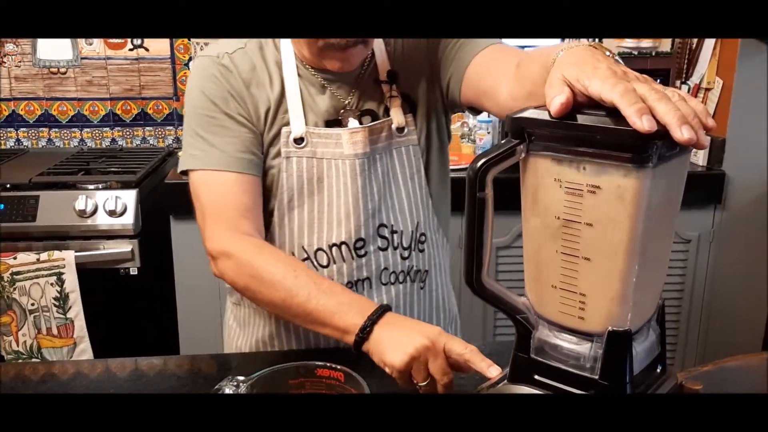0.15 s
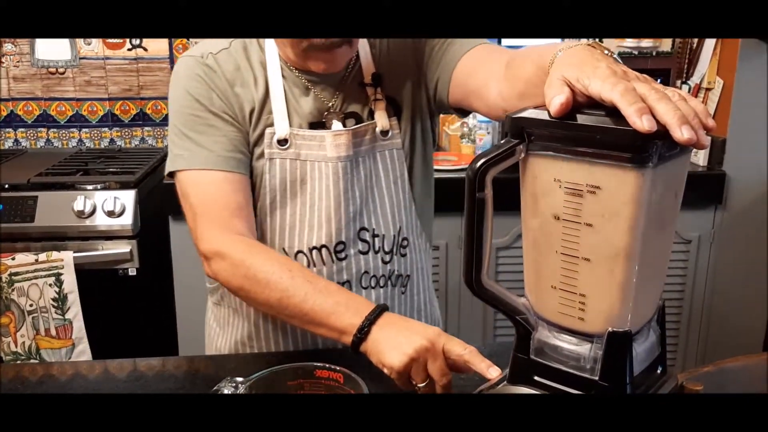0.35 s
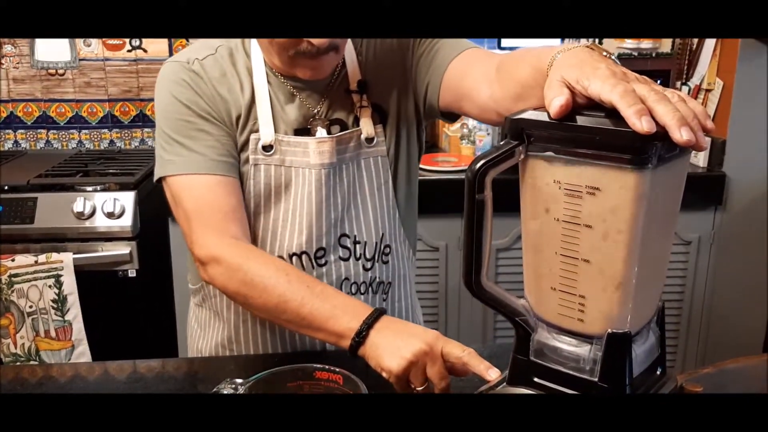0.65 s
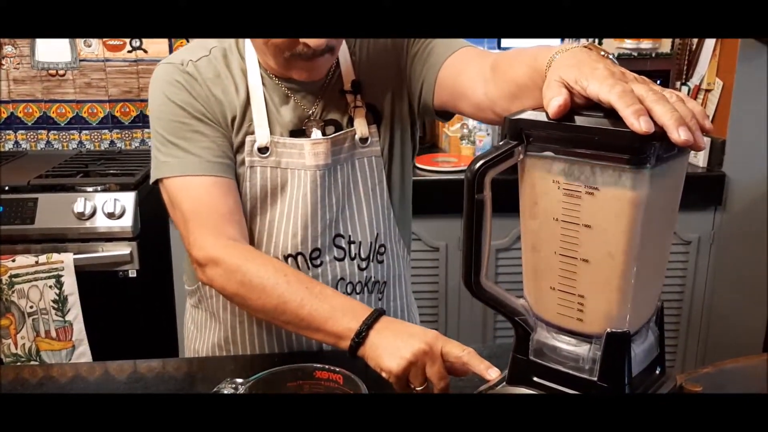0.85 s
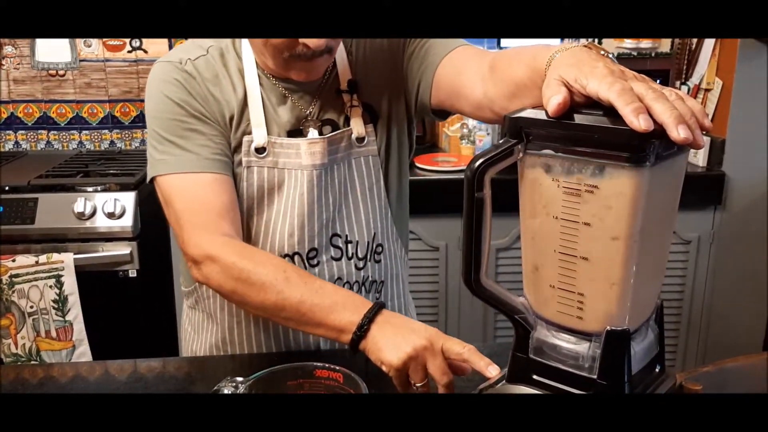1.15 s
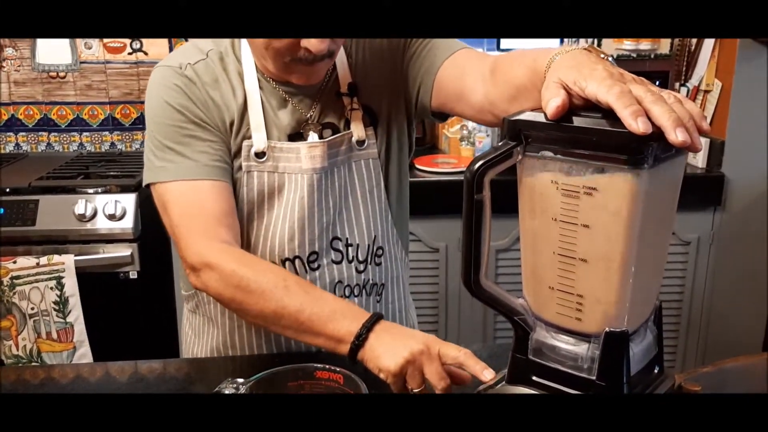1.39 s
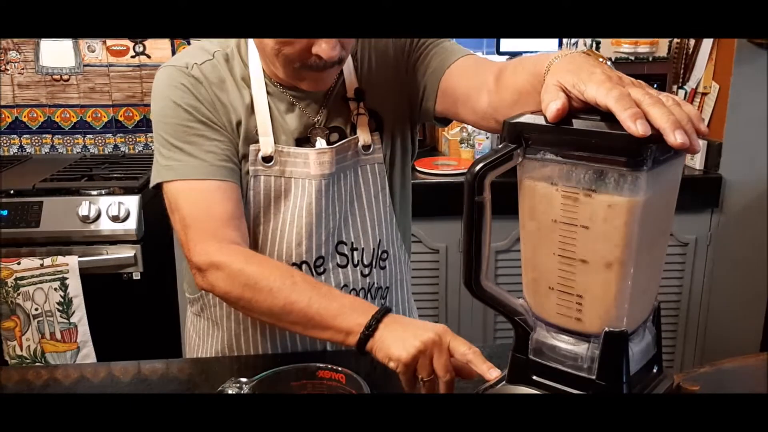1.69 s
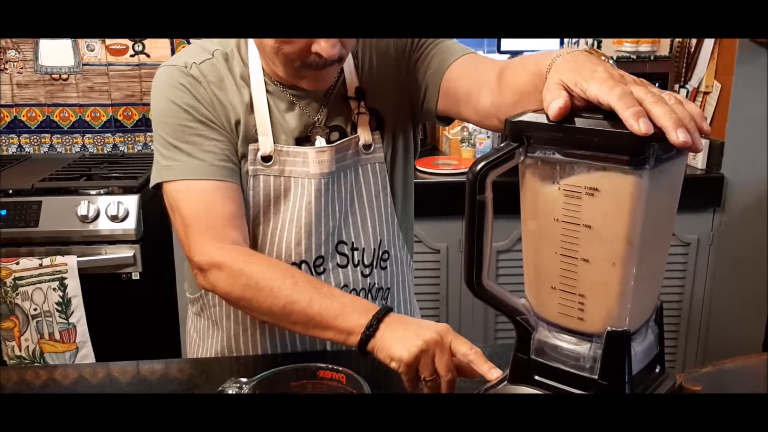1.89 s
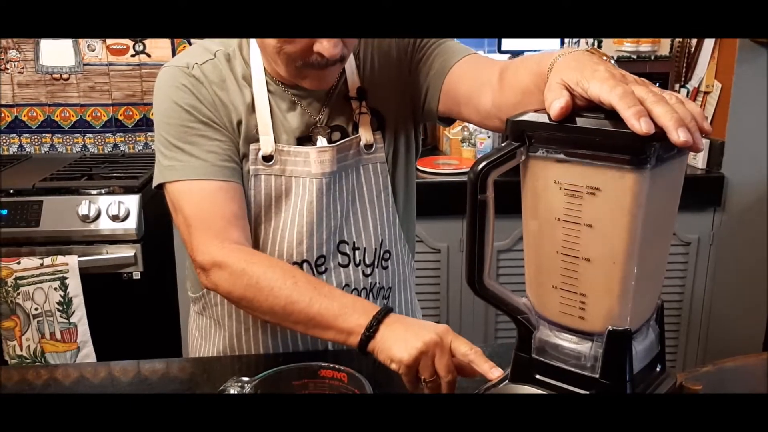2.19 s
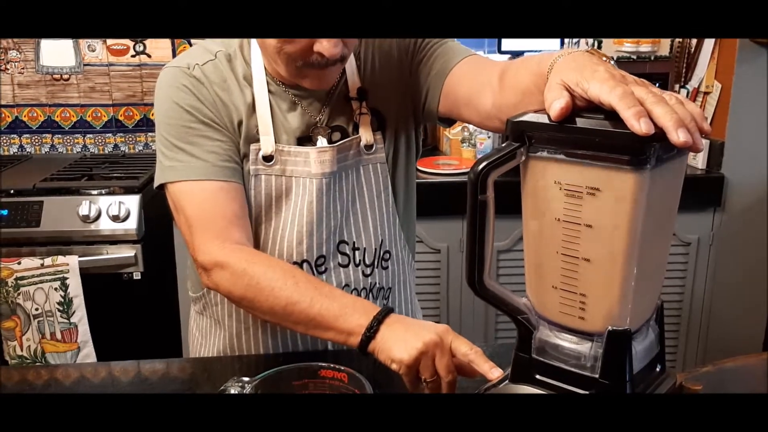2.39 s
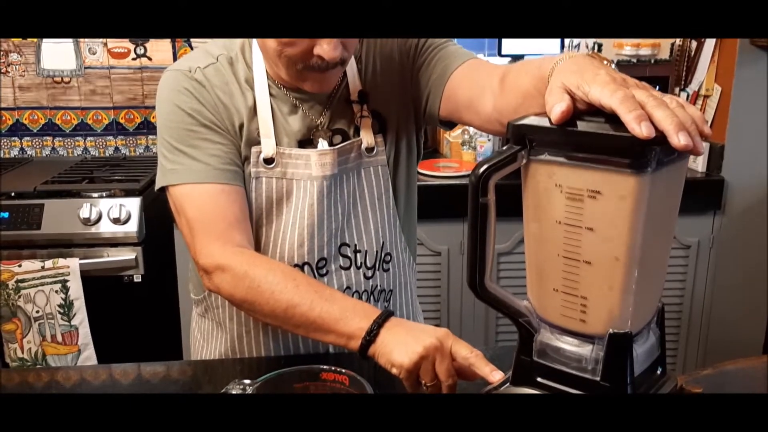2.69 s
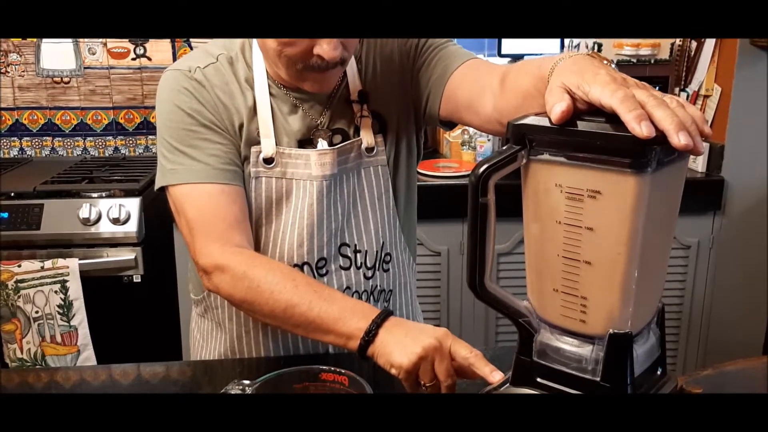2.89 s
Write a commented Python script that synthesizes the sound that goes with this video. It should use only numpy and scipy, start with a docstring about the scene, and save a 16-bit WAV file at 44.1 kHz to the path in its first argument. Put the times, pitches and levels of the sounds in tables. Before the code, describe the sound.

In a quiet kitchen, a blender whirs through a thick mixture, then coasts down as lumps knock and the liquid gurgles. After a brief lull it clacks back on, rising in pitch to a steady churn.

```python
"""A countertop blender churns a thick liquid, coasts almost to a stop, and starts again with a clack.
The speed of its shaft sets the low hum, the high motor whine and the rattle of the gears. The blades
push the liquid around and fling bits against the ringing jar. Lumps knock and the liquid gulps as its
whirlpool closes. At moments the treble cuts out and thin high tones sound. Behind it all is a quiet,
tiled kitchen."""
import sys
import numpy as np
from scipy import signal
from scipy.fft import rfft, irfft
from scipy.io import wavfile
from scipy.ndimage import uniform_filter1d

SR = 44100
rng = np.random.default_rng(int(sys.argv[2]) if len(sys.argv) > 2 else 0)


def inscribe(sig):
    """Save sig as 16-bit PCM at rate SR to the path in sys.argv[1].

    A 1-D sig is mono; a 2-D sig holds one channel per row.
    Samples are clipped to [-1, 1] before scaling.
    """
    pcm = np.round(np.clip(np.atleast_2d(sig).T, -1, 1) * 32767)
    wavfile.write(sys.argv[1], SR, pcm.astype(np.int16))


N = 134505
T = np.arange(N) / SR
FULL_SPEED = 56.1   # shaft turns per second


def from_db(db):
    """Turn decibels into a number to multiply a sound by."""
    return 10 ** (np.asarray(db) / 20)


def rms_one(x):
    """Scale a signal so that its average strength (rms) is 1."""
    return x / np.sqrt(np.mean(x ** 2) + 1e-20)


def curve(rows):
    """Join (seconds, value) points with straight lines."""
    return np.interp(T, *np.transpose(rows))


def drift(hz):
    """A smooth random wobble of about size 1; more hz makes it quicker."""
    pole = np.exp(-80 * np.pi * hz / SR)
    slow = signal.lfilter([1], [1, -2 * pole, pole * pole], rng.standard_normal(N // 40 + 2002))[2000:]
    return np.interp(np.arange(N) / 40, np.arange(len(slow)), rms_one(slow))


def colour(x, points, size=8192):
    """Make some pitches louder and others softer, following (Hz, dB) points."""
    hz, db = np.transpose(points)
    log_hz = np.log(np.linspace(1, SR / 2, size // 2 + 1))
    gain = rms_one(from_db(np.interp(log_hz, np.log(hz), db)))
    cepstrum = irfft(np.log(gain))[:size // 2]   # keeping half makes it ring only after a hit
    cepstrum[1:] *= 2
    return signal.fftconvolve(x, irfft(np.exp(rfft(cepstrum, size))))[:N]


def grains(per_s, spread_db):
    """Tiny random hits, a few much stronger than the rest."""
    hits = rng.random(N) < per_s / SR
    signs = rng.choice([-1, 1], N)
    return rms_one(hits * signs * from_db(spread_db * np.minimum(rng.exponential(1, N), 4)))


def shaft_tones(turns, rows, flutter_db, smear):
    """Slightly unsteady tones that rise and fall with the shaft's speed."""
    out = np.zeros(N)
    for per_turn, db in rows:
        level = np.sqrt(2) * from_db(db + flutter_db * drift(14.4))
        out += level * np.sin(2 * np.pi * per_turn * turns + smear * drift(8.5))
    return out


def chirps(rows, glide, smear):
    """Short wavering tones that swell and fade; the pitch slides by the fraction `glide`."""
    out = np.zeros(N)
    for middle, length, hz, db in rows:
        place = np.clip((T - middle) / length, -.5, .5)
        phase = 2 * np.pi * np.cumsum(hz * (1 + glide * place)) / SR + smear * drift(63)
        out += np.sqrt(2) * from_db(db) * np.cos(np.pi * place) * np.sin(phase)
    return out


# The tone of the quiet kitchen. Each row: pitch in Hz, boost or cut in dB.
ROOM_TONE = [(25, 0), (50, 3.5), (120, -0.5), (280, 0.5), (1000, -3.5), (2500, -24), (8000, -36),
             (15000, -34)]

def room_noise():
    """A faint, steady, low rush."""
    return from_db(-48) * colour(rng.standard_normal(N), ROOM_TONE)


def kitchen_echo(x, fade_s=.28):
    """Add a short wash of sound bouncing off the tiles."""
    age = T[:SR // 2]
    tail = rng.standard_normal(len(age)) * from_db(-60 * age / fade_s) * (age > .003)
    return x + from_db(-8) * signal.fftconvolve(x, tail / np.linalg.norm(tail))[:N]


# Dips in the treble. Each row: start in seconds, end in seconds, cut in dB.
TREBLE_DIPS = [(.11, .12, -14), (.361, .376, -12), (.406, .419, -11), (.492, .505, -12), (1.8, 1.845, -52),
               (2.009, 2.02, -12), (2.839, 2.849, -10)]

def dip_treble(x, above_hz=2040):
    """The high part of the sound drops away for a few instants."""
    bass = signal.sosfiltfilt(signal.butter(12, above_hz, fs=SR, output="sos"), x)
    gain = np.ones(N)
    for start, end, db in TREBLE_DIPS:
        gain[(T > start) & (T < end)] = from_db(db)
    return bass + (x - bass) * uniform_filter1d(gain, size=130)


# Thin high tones. Each row: middle in seconds, length in seconds, pitch in Hz, level in dB.
THIN_TONES = [(.385, .09, 8450, -42), (.41, .04, 4500, -36), (.52, .16, 8550, -48), (1.825, .07, 3230, -36),
              (1.82, .06, 8300, -40), (1.825, .1, 8620, -43), (1.83, .07, 1870, -28),
              (1.81, .06, 1500, -27)]

def thin_tones():
    """Brief thin high tones, several sounding while the treble cuts out."""
    return chirps(THIN_TONES, glide=0, smear=.52)


# Gulps. Each row: middle in seconds, length in seconds, pitch in Hz, level in dB.
GULPS = [(.797, 0.027, 273.3, -24.5), (1.07, 0.036, 1070, -31), (1.078, 0.036, 509, -28.5),
         (1.145, 0.044, 1320, -34.5), (1.205, 0.063, 293, -31.5), (1.225, 0.11, 547, -38),
         (1.275, .07, 518, -44)]

def gulps():
    """The liquid makes short falling notes as its whirlpool closes."""
    return chirps(GULPS, glide=-.15, smear=.4)


# The clack's notes. Each row: start in seconds, pitch in Hz, level in dB, seconds to fade by 60 dB.
CLACK_NOTES = [(1.697, 2760, -15.5, 0.024), (1.697, 1470, -13, 0.031)]

def drive_clack():
    """The link between motor and blades rings for an instant as it catches."""
    out = np.zeros(N)
    for start, hz, db, fade_s in CLACK_NOTES:
        age = np.maximum(T - start, 0)
        out += from_db(db - 60 * age / fade_s) * np.sin(2 * np.pi * hz * age)
    return out


# Knocks. Each row: start in seconds, level of the thud in dB, level of the click in dB.
KNOCKS = [(0.11, -7, -45), (.405, -9, -33), (0.498, -15, -40), (0.51, -13, -39), (0.577, -19, -27),
          (.769, -13, -20.5), (0.82, -16, -34), (0.88, -31, -22.5), (0.8892, -10.5, -43),
          (0.925, -22.5, -51), (1.0, -22, -26.5), (1.069, -24, -35), (1.114, -22, -27), (1.139, -25, -38),
          (1.433, -39, -60), (1.488, -52, -64), (1.542, -37, -47), (1.635, -31, -36), (1.671, -37, -43),
          (1.697, -10, -20), (1.745, -12.5, -23), (1.764, -30, -27), (1.785, -13, -26), (2.147, -12, -21),
          (2.302, -10, -40), (2.475, -19, -19)]

def knocks(thud_fade_s=.04, click_fade_s=.02):
    """Lumps and the drive knock: two quick bursts of noise each, for a thud and a click."""
    thuds, clicks = np.zeros((2, N))
    for start_s, thud_db, click_db in KNOCKS:
        start = int(start_s * SR)
        age = T[:min(N - start, SR // 5)]
        thuds[start:start + len(age)] += from_db(thud_db - 60 * age / thud_fade_s)
        clicks[start:start + len(age)] += from_db(click_db - 60 * age / click_fade_s)
    return thuds * rng.standard_normal(N), clicks * rng.standard_normal(N)


# The tone of a sharp tick on the jar wall. Each row: pitch in Hz, boost or cut in dB.
TICK_TONE = [(500, -19), (3000, -15.5), (5500, 4.5), (8500, -0.5), (11000, -2.5), (14000, -6.5),
             (15800, -12)]

def ticks(spray_db, clicks):
    """Hard bits snap against the jar, and the knocks get the same sharp edge."""
    level = from_db(-27.5 + .76 * spray_db)   # fades less than the spray, so lone ticks stand out
    lone_bits = level * colour(grains(per_s=45, spread_db=3.5), TICK_TONE)
    return lone_bits + from_db(-8) * colour(clicks, TICK_TONE)


# The boom, strongest as the liquid spins up again. Each row: time in seconds, level in dB.
BOOM_LEVEL = [(0, -27), (.6, -41), (1.2, -56), (1.4, -58), (1.692, -49), (1.70, -22), (1.85, -20.5),
              (2.03, -18.5), (2.3, -25.5), (2.6, -28.5), (3.05, -46)]

def liquid_boom(hz=281, width_hz=85):
    """Soft blows from the swirling liquid ring the jar's lowest note."""
    band = signal.butter(2, [hz - width_hz / 2, hz + width_hz / 2], "band", fs=SR, output="sos")
    blows = grains(per_s=400, spread_db=3) + 1e-18
    return from_db(curve(BOOM_LEVEL)) * rms_one(signal.sosfilt(band, blows))


# The tones of the hum. Each row: vibrations per shaft turn, level in dB at full speed and load.
HUM_TONES = [(1, -43), (2, -43), (3, -43), (4, -26), (6, -36), (7, -35), (8, -34), (9, -34), (12, -25),
             (20, -38)]

def hum(turns, speed, load, magnetic_hz=120.7):
    """Shaft, blades and gears hum louder with speed; the motor's magnetic hum keeps one pitch."""
    level = (speed / FULL_SPEED) ** 4.4 * np.sqrt(load)
    spinning = level * shaft_tones(turns, HUM_TONES, flutter_db=2, smear=.35)
    magnetic = np.sqrt(2) * from_db(-43.5) * load * np.sin(2 * np.pi * magnetic_hz * T)
    return spinning + magnetic


# The tones of the whine. Each row: vibrations per shaft turn, starting level in dB.
WHINE_TONES = [(48, -46), (96, -36.5), (192, -45), (288, -39)]
# How well the motor's case lets sound out. Each row: pitch in Hz, boost or cut in dB.
CASE_TONE = [(600, 16), (1700, 17), (2600, 3.5), (3400, 7), (4200, 6), (4800, 4.5), (5050, -6), (5250, 1),
             (5500, -6), (6500, -34), (8600, 8), (9800, -5), (10800, -10), (12300, -17), (13300, -4),
             (14600, -8), (15800, -22)]
# How the whine fades and returns. Each row: time in seconds, boost or cut in dB.
WHINE_LEVEL = [(0, 1), (.2, 0), (.36, -2), (.48, -10.5), (.6, -3), (.9, -12.5), (1.15, -21), (1.35, -50),
               (1.55, -55), (1.88, -15), (2.05, -1.5), (3.05, -1)]

def motor_whine(turns, speed, rasp_hz=160):
    """High motor tones swell as they slide through the pitches at which the case rings."""
    whine = np.zeros(N)
    for per_turn, db in WHINE_TONES:
        case_gain = from_db(np.interp(per_turn * speed, *np.transpose(CASE_TONE)))
        whine += case_gain * shaft_tones(turns, [(per_turn, db)], flutter_db=1.5, smear=.45)
    rasp = .15 + 1.3 * np.maximum(1 - speed / FULL_SPEED, 0)   # slow, slack gears rasp more
    roughness = (1 + rasp * drift(rasp_hz)) / np.sqrt(1 + rasp ** 2)
    return whine * roughness * from_db(curve(WHINE_LEVEL))


def gear_rattle(turns, teeth=12, spread_db=2.5, slack=.3):
    """Each gear tooth clicks with its own strength; the loose fit makes time and force uneven."""
    tooth = np.arange(int(turns[-1] * teeth))
    lateness, force = rng.standard_normal((4000, 2))[tooth].T
    hit_at = np.interp((tooth + slack * lateness) / teeth, turns, np.arange(N)).astype(int)
    signs = rng.choice([-1, 1], len(hit_at), p=[.3, .7])
    own_strength = rng.standard_normal(teeth)[tooth % teeth] / 2
    clicks = np.zeros(N)
    clicks[hit_at] = signs * from_db(spread_db * (force + own_strength))
    return rms_one(clicks / np.sqrt(np.gradient(turns)))   # same average strength at any speed


# The notes of the jar and base. Each row: pitch in Hz, relative level in dB, seconds to fade by 60 dB.
JAR_NOTES = [(279.6, 4.5, 0.037), (481, 18.5, 0.069), (673, -4, 0.027), (783, 7.5, 0.21), (1105, 1.5, 0.21),
             (1287, -1, 0.017), (1720, -45.5, 0.015)]
# The overall tone of the jar and case. Each row: pitch in Hz, boost or cut in dB.
JAR_TONE = [(25, -46.5), (70, -27), (115, -11), (160, -17.5), (220, -6.5), (290, 5), (390, -6.5), (520, 1),
            (660, 1.5), (790, -2.5), (880, -4.5), (1080, -1.5), (1180, -6), (1400, -4), (1800, -9),
            (2300, -27), (4000, -21), (15000, -74)]
# The brighter tone of fine bits hitting the wall. Each row: pitch in Hz, boost or cut in dB.
SPRAY_TONE = [(300, -49), (1500, -12), (2100, 4), (2700, 4.5), (3500, -3.5), (4800, -3.5), (6100, -3),
              (7000, -7), (8600, -3), (9700, -12), (11300, -22), (13500, -16), (15800, -20)]

def jar(heavy_hits, fine_hits):
    """Heavy hits sound dull and make the plastic jar ring; fine hits sound bright."""
    ring = sum(from_db(db - 60 * T / fade_s) * np.sin(2 * np.pi * hz * T) for hz, db, fade_s in JAR_NOTES)
    ringing = from_db(-15) * signal.fftconvolve(heavy_hits, ring / np.linalg.norm(ring))[:N]
    return colour(heavy_hits, JAR_TONE) + ringing + colour(fine_hits, SPRAY_TONE)


def churning(turns, blades=4):
    """The liquid surges at each blade over rattling gears. Gives the churn and the fine spray."""
    rattle = gear_rattle(turns)
    blade_push_db = 1.48 * np.cos(2 * np.pi * blades * turns) + .5 * np.cos(2 * np.pi * turns)
    surge = rms_one(from_db(blade_push_db + 1.75 * drift(23.3)))
    liquid = surge * grains(per_s=5000, spread_db=3.5)
    crackle = from_db(-8) * grains(per_s=1500, spread_db=2.5)
    hiss = from_db(-1.5) * rng.standard_normal(N)
    churn = from_db(-5.5) * rattle + from_db(-3.5) * liquid
    spray = surge * (crackle + hiss) + from_db(-14.5) * rattle
    return churn, spray


# How fast the blades spin. Each row: time in seconds, turns per second.
SHAFT_SPEED = [(0, 53.9), (.1, 54.7), (.21, 54.6), (.37, 42.8), (.52, 34.0), (.66, 26.2), (.86, 18.6),
               (.94, 14.8), (1.48, 2), (1.55, 21), (1.82, 33.6), (1.95, 42), (2.03, 44.9), (2.2, 49.9),
               (2.32, 52), (2.52, 54.3), (2.75, 55.7), (3.05, 56.3)]
# How loud the churning and rattling are. Each row: time in seconds, relative level in dB.
CHURN_LEVEL = [(0, -14.5), (.15, -16.5), (.4, -18.5), (.55, -20), (.69, -24), (.79, -23.5), (1.0, -28.5),
               (1.21, -33.5), (1.31, -41.5), (1.41, -58), (1.52, -69), (1.575, -40.5), (1.615, -55),
               (1.692, -46.5), (1.699, -20), (1.8, -17), (2.2, -15.5), (3.05, -16.5)]
# How loud the bright spray is. Each row: time in seconds, relative level in dB.
SPRAY_LEVEL = [(0, -25), (.2, -26), (.5, -31), (.8, -33), (1.0, -42), (1.15, -43.5), (1.3, -56),
               (1.42, -64), (1.53, -74), (1.62, -59), (1.692, -51), (1.70, -40), (1.76, -34), (1.88, -27.5),
               (2.15, -25.5), (3.05, -26.5)]

def blender():
    """One shaft slows and speeds up again, driving the churning, the hum and the whine."""
    speed = curve(SHAFT_SPEED) * (1 + .002 * drift(8))
    turns = np.cumsum(speed) / SR
    churn_db, spray_db = curve(CHURN_LEVEL), curve(SPRAY_LEVEL)
    load = from_db(churn_db - churn_db.max())   # how hard the motor works, up to 1
    churn, spray = churning(turns)
    thuds, clicks = knocks()
    low_hum = hum(turns, speed, load)
    jar_sound = jar(from_db(churn_db) * churn + thuds, from_db(spray_db) * spray + clicks)
    clatter = kitchen_echo(jar_sound + drive_clack() + ticks(spray_db, clicks))
    clatter_and_whine = dip_treble(clatter + motor_whine(turns, speed))
    return clatter_and_whine + low_hum + liquid_boom() + thin_tones() + gulps()


def scene():
    """The blender in the quiet kitchen, as one channel."""
    return (blender() + room_noise())[None]


def record(dry, low_cut_hz=39, high_cut_hz=15850):
    """The microphone loses the deep bass, rounds off the peaks and cuts the highest treble."""
    out = signal.sosfilt(signal.butter(3, low_cut_hz, "high", fs=SR, output="sos"), dry)
    out = 1.2 * np.tanh(out / 1.2)
    return signal.sosfilt(signal.ellip(12, .1, 80, high_cut_hz, fs=SR, output="sos"), out)


dry = scene()
out = record(dry)
inscribe(out)
```